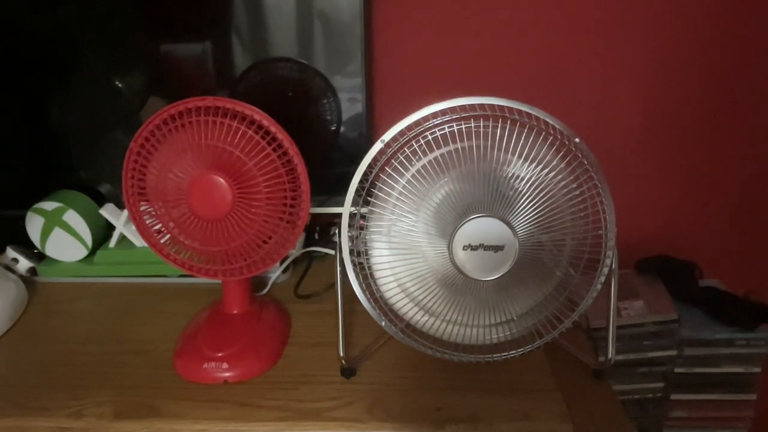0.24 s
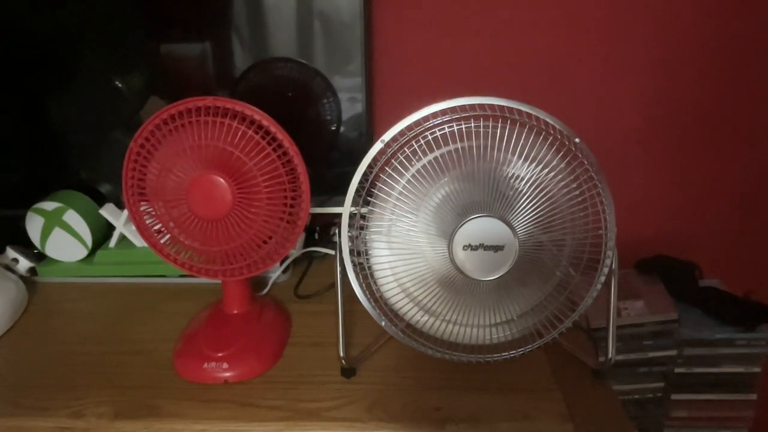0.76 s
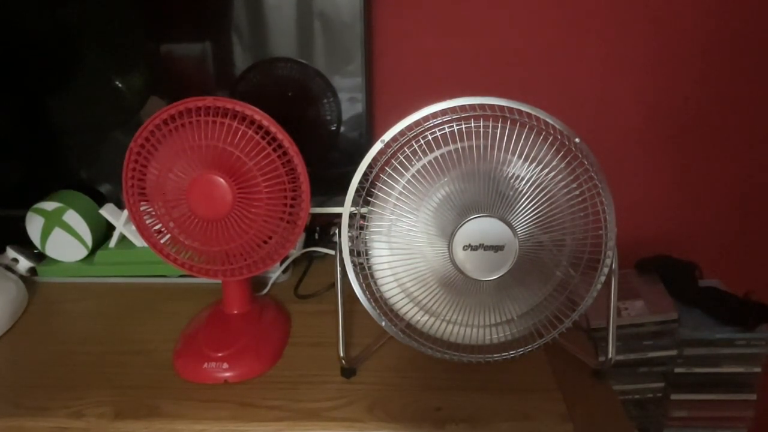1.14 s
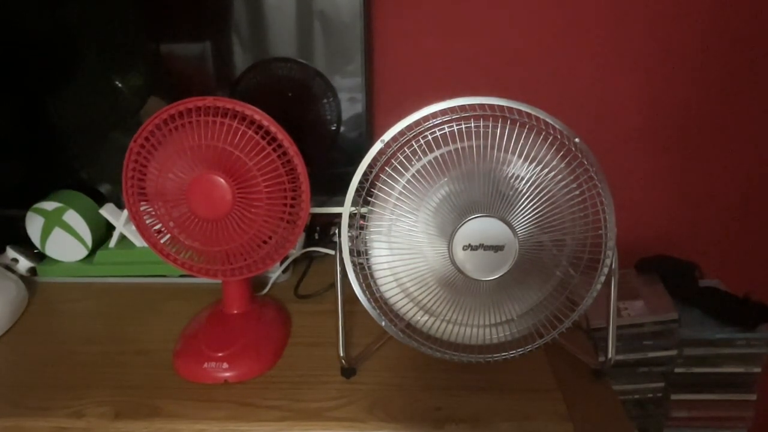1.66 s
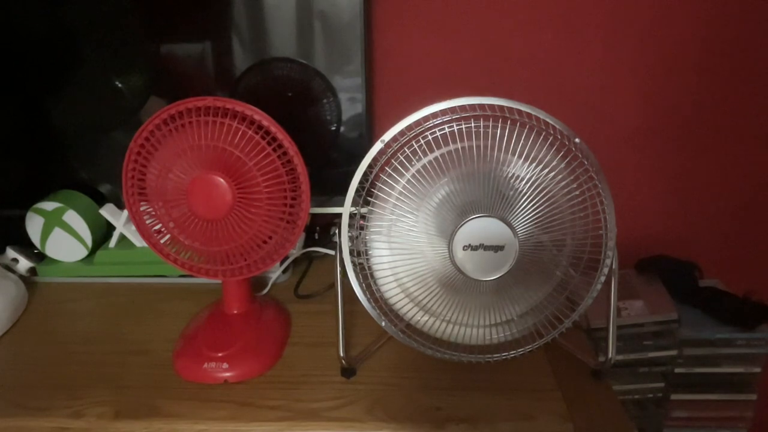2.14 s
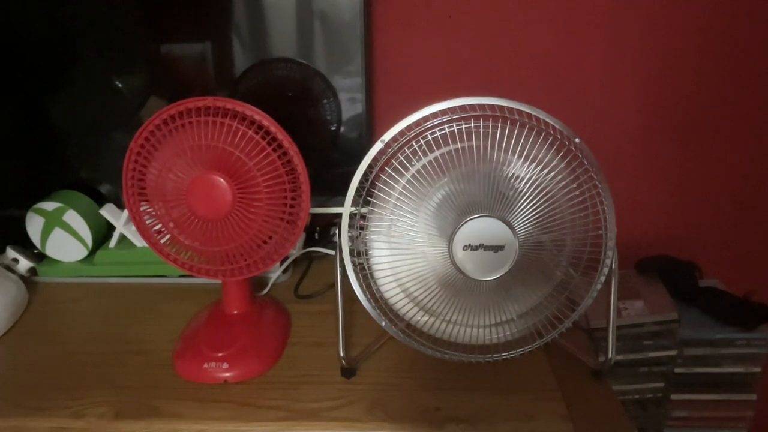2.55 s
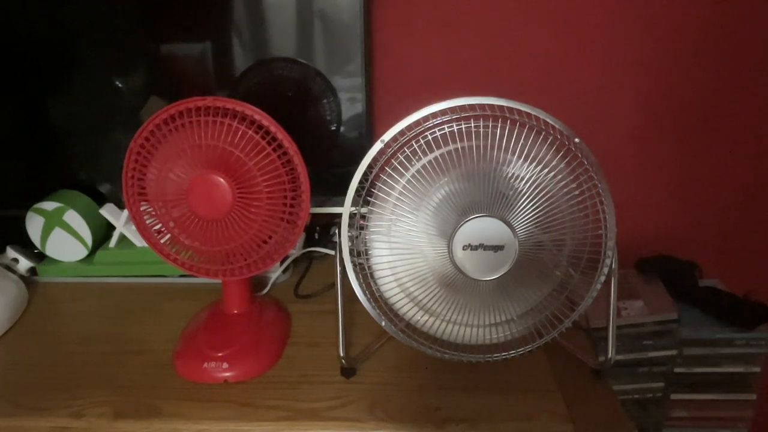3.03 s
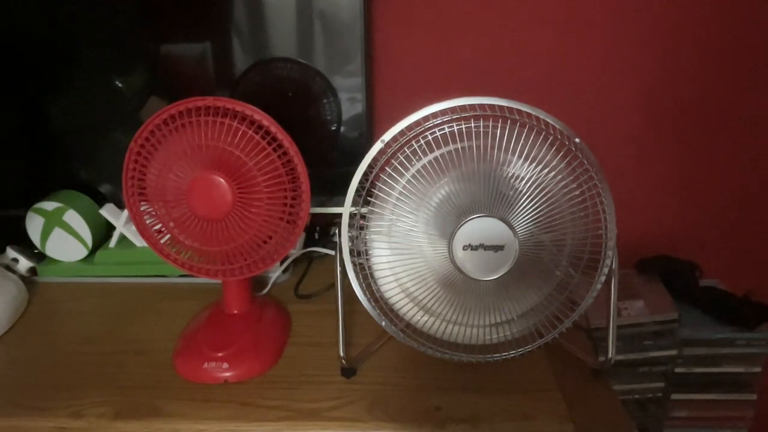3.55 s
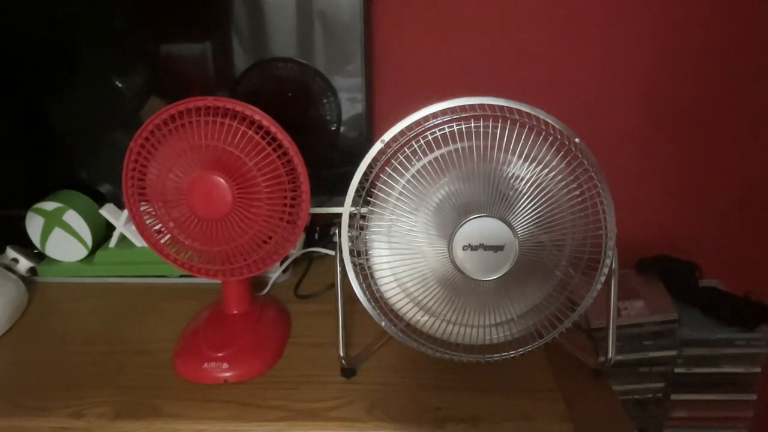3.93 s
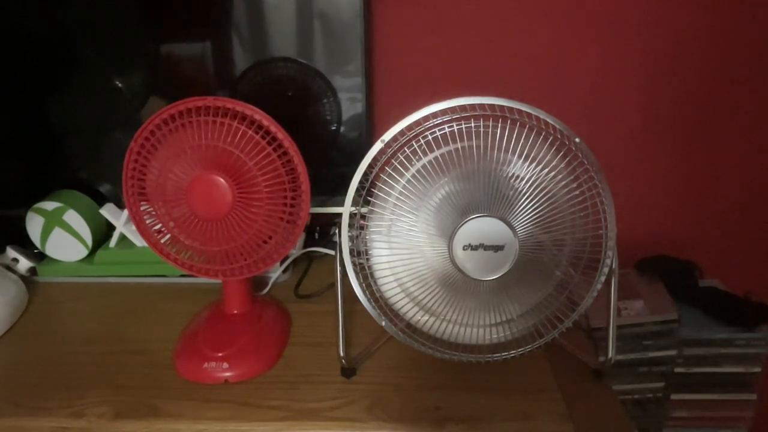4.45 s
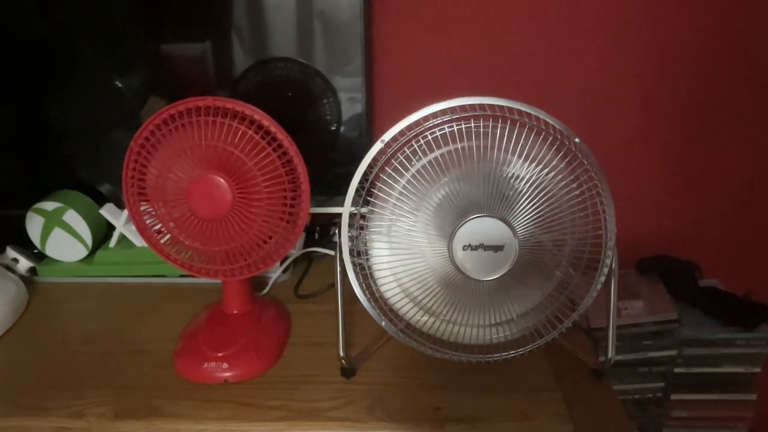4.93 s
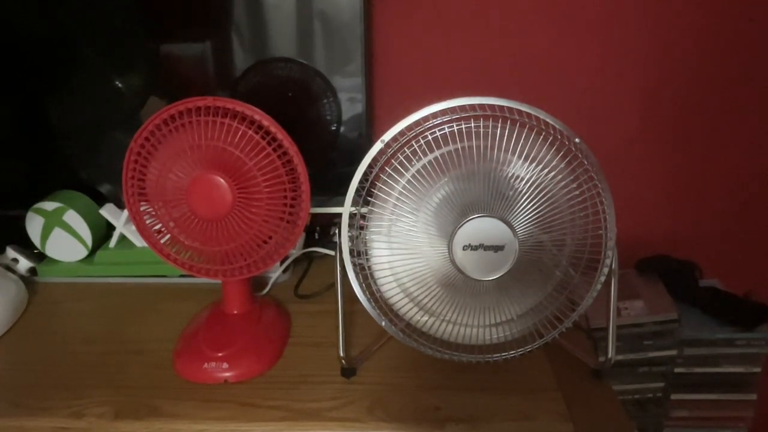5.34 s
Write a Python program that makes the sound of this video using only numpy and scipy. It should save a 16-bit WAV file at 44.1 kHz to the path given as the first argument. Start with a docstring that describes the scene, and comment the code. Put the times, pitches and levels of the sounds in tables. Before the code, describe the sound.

Two desk fans blow straight onto close microphones: deep, uneven wind rumble and fluttering buffets over a quiet airy hiss and faint whine.

```python
"""In a small room, two desk fans on low speed blow straight at a pair of microphones.
Shaken tones that follow the fan speed make a soft whine; coloured noise is the hiss of the blades.
Band-filtered noise makes the draught's rumble on the ports, which swells and sinks with the flow.
Short wave packets that fall in pitch are eddies, heard as quick buffets, flutters and thumps."""
import sys
import numpy as np
from scipy import signal
from scipy.fft import rfft, irfft, next_fast_len
from scipy.io import wavfile
from scipy.ndimage import uniform_filter1d

SR = 44100
rng = np.random.default_rng(int(sys.argv[2]) if len(sys.argv) > 2 else 0)


def generate_wav(sig):
    """Save sig (samples, or channels by samples) to the path in sys.argv[1] as 16-bit PCM at SR."""
    pcm = np.round(np.clip(np.atleast_2d(sig).T, -1, 1) * 32767).astype(np.int16)
    wavfile.write(sys.argv[1], SR, pcm)


N = 246078  # samples in the scene


def from_db(db):
    """Logarithmic level: decibels to amplitude gain."""
    return 10 ** (np.asarray(db) / 20)


def rms_one(x):
    """Normalisation: scale to unit root mean square over all channels."""
    return x / np.sqrt(np.mean(x ** 2) + 1e-20)


def in_time(rows):
    """Linear interpolation: a curve over time read at every sample."""
    return np.interp(np.arange(N) / SR, *np.transpose(rows))


def at_hz(points, hz):
    """Logarithmic frequency scale: a table read at the frequencies hz."""
    table = np.array(points)
    return np.interp(np.log(np.maximum(hz, 1)), np.log(table[:, 0]), table[:, 1])


def drift(rate):
    """Low-passed noise: slow chance with about `rate` changes a second, unit rms."""
    step = 40  # samples between the slow values
    pole = np.exp(-2 * np.pi * rate * step / SR)
    white = rng.standard_normal(N // step + 2002)
    slow = signal.lfilter([1], [1, -2 * pole, pole * pole], white)[2000:]  # settled part only
    return np.interp(np.arange(N) / step, np.arange(len(slow)), rms_one(slow))


def butter(x, edges_hz, kind):
    """Maximally flat response: a causal second-order Butterworth filter."""
    return signal.sosfilt(signal.butter(2, edges_hz, kind, fs=SR, output="sos"), x)


def tone(hz, level_db, pan_db, lag_ms, unsteady, width_hz=20, own=0.55, fade_db=2.0):
    """Random modulation: turbulent inflow shakes level and phase, partly alike at both microphones."""
    shared, near, far = (drift(width_hz) + 1j * drift(width_hz) for _ in range(3))
    shake = 1 + unsteady * (np.sqrt(1 - own) * shared + np.sqrt(own) * np.array([near, far]))
    left, right = shake * np.exp(2j * np.pi * np.cumsum(hz) / SR)
    left = left * np.exp(-2j * np.pi * hz * lag_ms / 1000)
    fading_db = fade_db * min(unsteady, 1) * drift(2)
    pair = np.real([left * from_db(pan_db), right])
    return from_db(level_db + fading_db) * rms_one(pair)


# fan speed, as the pitch of the main whine: t/s, f/Hz
FAN_SPEED = [(0, 650), (2.6, 651), (3.3, 655), (4.3, 658.5), (5.58, 660)]
# whine of one fan: multiple of the main pitch, starting level/dB, level slope/(dB per % of speed),
# left over right/dB, left lag/ms
WHINE_TONES = [(1, -45, -3.5, -2, 1.246), (1.546, -65.5, 4.5, 5, 0.98), (1.697, -60.5, 2, 2, 0.8),
               (2.275, -64, 1.5, 4, 0.77), (2.984, -66, 3.5, 12, .64)]
# shake of the main tone as a share of its level, and the power of the multiple by which it grows
UNSTEADY, UNSTEADY_POWER = .22, 2.4
# thin tone of the other fan: f/Hz, level/dB
STEADY_WHINE_HZ, STEADY_WHINE_DB = 1861.0, -68.5


def whine():
    """Proportional pitch: one fan's tones follow its speed over the room's peaks and dips; the other's holds."""
    pitch_hz = in_time(FAN_SPEED)
    faster_percent = 100 * (pitch_hz / pitch_hz[0] - 1)
    tones = np.zeros((2, N))
    for multiple, level_db, slope_db, pan_db, lag_ms in WHINE_TONES:
        unsteady = UNSTEADY * multiple ** UNSTEADY_POWER
        tone_db = level_db + slope_db * faster_percent
        tones += tone(multiple * pitch_hz, tone_db, pan_db, lag_ms, unsteady)
    steady_hz = np.full(N, STEADY_WHINE_HZ)
    return tones + tone(steady_hz, STEADY_WHINE_DB, pan_db=2.5, lag_ms=0.52, unsteady=0.14)


# spectrum of air through blades and grilles: f/Hz, relative density level/dB
AIR_SPECTRUM = [(400, 0.5), (880, -2), (1100, -3), (1300, -3), (1550, -3.5), (1950, -4.5), (2700, -3.5),
                (3400, -8.5), (4300, -10.5), (5500, -8), (7000, -13.5), (9000, -22), (10800, -34),
                (13500, -39)]
# its narrow peaks and dips: centre f/Hz, width/Hz, level/dB
AIR_PEAKS = [(672, 115, 12), (1344, 77, -3), (1560, 150, 2), (1730, 78, 0), (1870, 91, 3.5), (2000, 90, -1),
             (2270, 260, 2.5), (2400, 67, 0.5)]
AIR_DB, BLADE_HZ = -44.5, 87  # hiss level/dB, blade passing rate f/Hz


def blade_air(chop=0.04, waver_db=0.53):
    """Amplitude modulation: grille hiss, coloured by desk and walls, is chopped by each passing blade."""
    hz = np.fft.rfftfreq(N, 1 / SR)
    colour_db = at_hz(AIR_SPECTRUM, hz)
    for centre_hz, width_hz, peak_db in AIR_PEAKS:
        colour_db = colour_db + peak_db / (1 + (2 * (hz - centre_hz) / width_hz) ** 2)
    hiss = irfft(rfft(rng.standard_normal((2, N))) * from_db(colour_db), N)
    passing = 1 + chop * np.sin(2 * np.pi * BLADE_HZ * np.arange(N) / SR)
    return from_db(AIR_DB + waver_db * drift(27)) * passing * rms_one(hiss)


# strength of the draught, with its surges and lulls: t/s, level/dB
DRAUGHT_STRENGTH = [(0.0, -25), (0.6, -24.5), (0.68, -30.5), (0.82, -22.5), (1.2, -25.5), (1.33, -28.5),
                    (1.45, -23.5), (2.02, -25.5), (2.14, -23.5), (2.28, -23), (2.41, -29.5), (2.47, -22.5),
                    (2.62, -24.5), (2.7, -35), (2.8, -25.5), (3.7, -23.5), (4.08, -26), (4.5, -23.5),
                    (4.72, -25), (5.58, -27)]


def flow(strong, stir=0.29, stir_s=.035, calm_db=-25):
    """Short-time power: draught strength in dB, raised where strong eddies stir the air."""
    power = uniform_filter1d(np.mean(strong ** 2, axis=0), int(stir_s * SR))
    power = np.maximum(power, 0)
    stirred_db = stir * 10 * np.log10(1 + power / from_db(calm_db) ** 2)
    return in_time(DRAUGHT_STRENGTH) + stirred_db


# spectrum of the rumble: f/Hz, relative density level/dB
RUMBLE_SPECTRUM = [(20, -23.5), (28, -18.5), (40, -8.5), (62, 6), (85, 2), (120, 0), (180, -5), (260, -9.5),
                   (350, -14), (450, -20), (600, -25), (800, -36), (1100, -52.5)]


def draught(flow_db, level_db=-24.0, lumpy_db=2, patchy_db=2, eddy_rate=24, gust_tilt=0.94):
    """Turbulence spectrum: the smallest eddies rumble; a stronger flow lifts the upper bands most."""
    swing_db = flow_db - flow_db.mean() + lumpy_db * drift(eddy_rate)
    edges_hz = 18 * 2 ** np.arange(0, 6.1, .5)  # half-octave bands
    white = rng.standard_normal((2, 2, N + SR // 2))
    rumble = np.zeros((2, N))
    for k, (low, high) in enumerate(zip(edges_hz, edges_hz[1:])):
        hz = np.sqrt(low * high)
        response = np.clip(1 + gust_tilt * np.log2(hz / 80), .8, 1.5)
        gain = rms_one(from_db(response * swing_db + patchy_db * drift(eddy_rate)))
        band = butter(white[k % 2], [low, high], "band")[:, -N:]  # neighbours use separate noise
        rumble += from_db(at_hz(RUMBLE_SPECTRUM, hz)) * gain * band
    return from_db(level_db) * rms_one(rumble)


# strength of eddies at each pitch: f/Hz, relative level/dB
EDDY_STRENGTH = [(45, -7), (65, -0.5), (120, 1), (200, 0), (300, 1.5), (420, -1.5), (560, -10), (800, -16)]
# weak eddies: rate/(1/s), rms level of them all/dB, spread of strength either way/dB
EDDIES_PER_S, EDDY_DB, EDDY_SPREAD_DB = 85, -27, 2


def weak_eddies(flow_db, cycles=0.88):
    """Random shedding: weak eddies of all sizes, stronger in a surge, as rows like those of STRONG_EDDIES."""
    chance = rng.random((int(EDDIES_PER_S * N / SR), 3))
    at = (chance[:, 0] * N).astype(int)
    lowest, highest = EDDY_STRENGTH[0][0], EDDY_STRENGTH[-1][0]
    hz = lowest * (highest / lowest) ** chance[:, 1]
    spread_db = EDDY_SPREAD_DB * (2 * chance[:, 2] - 1)
    level_db = flow_db[at] + at_hz(EDDY_STRENGTH, hz) + spread_db
    return zip(at / SR, level_db, hz, np.full(len(at), cycles))


# lesser eddies: level against the strong one/dB, pitch spread either way/octaves
WAKE_DB, WAKE_OCTAVES = -11.5, 1.077
# middle delay/s, scatter either way/s, trailing of lower ones/cycles
WAKE_DELAY_S, WAKE_SCATTER_S, WAKE_TRAIL = 0.00402, 0.01199, 1.1


def wakes(eddies, count=3, cycles=1.13):
    """Eddy break-up: each strong eddy yields lesser ones; low pitch adds delay, scatter moves them in time."""
    rows = []
    for s, level_db, hz, _ in eddies:
        for pitch, time in rng.uniform(-0.998, 1, (count, 2)):
            own_hz = np.clip(hz * 2 ** (WAKE_OCTAVES * pitch), 50, 900)
            trail_s = WAKE_TRAIL * (1 / own_hz - 1 / hz)
            delay_s = WAKE_DELAY_S + WAKE_SCATTER_S * time + trail_s
            size_db = min(at_hz(EDDY_STRENGTH, own_hz) - at_hz(EDDY_STRENGTH, hz), 4)
            rows.append((s + delay_s, level_db + WAKE_DB + size_db, own_hz, cycles))
    return rows


SLOWING = .18  # an eddy slows as it spreads: growth of its period per unit of time


def buffet(level_db, hz, cycles):
    """Chirped wave packet: a few swings of pressure swell, fade and drop in pitch."""
    t = np.arange(-(SR // 10), SR // 10) / SR
    turns = np.log(np.maximum(1 + SLOWING * hz * t, .01)) / SLOWING  # cycles from the crest
    swell = from_db(level_db) * np.exp(-.5 * (turns / cycles) ** 2)
    ends = np.minimum((t[-1] - np.abs(t)) / .03, 1)
    phase = rng.random((2, 1))  # its own in each channel
    return swell * ends * np.cos(2 * np.pi * (turns + phase))


# strong eddies striking the ports, deep thumps to quick flutters:
# crest t/s, crest level/dB, crest f/Hz, half-length/cycles
STRONG_EDDIES = [(0.042, -12, 400, 0.46), (0.05, -12, 113.6, 1.1), (0.109, -18.5, 309, 1.1),
                 (0.121, -22.5, 516, 0.65), (0.172, -8, 174, 0.54), (0.294, -12, 63.3, 0.81),
                 (0.338, -18, 313, 0.76), (0.431, -16, 80, 1.7), (0.476, -13.5, 132.3, 0.57),
                 (0.531, -14, 200, 0.6), (0.538, -14, 74.8, 0.9), (0.58, -15.0, 252, 0.72),
                 (0.589, -10.5, 92, 0.6), (0.624, -14, 145, 0.48), (0.728, -15, 98.8, 0.92),
                 (0.786, -13.5, 200, 0.41), (0.796, -14.5, 226.5, 0.48), (0.889, -16.5, 219, 1.6),
                 (0.894, -18, 397, 0.8), (0.896, -15.5, 550, 0.6), (0.9, -14, 254.5, 1.4),
                 (0.925, -11, 310, 0.35), (0.999, -11, 180, 0.31), (1.011, -10, 113, 0.48),
                 (1.048, -12, 145, 0.47), (1.102, -8.5, 101.5, 0.53), (1.147, -14, 253, 0.6),
                 (1.169, -16.5, 500, 0.82), (1.174, -11, 178, 0.65), (1.23, -21, 448, 2.5),
                 (1.235, -4.5, 222, 0.54), (1.241, -5.5, 114.2, 0.35), (1.247, -11.5, 354, 0.39),
                 (1.259, -12, 281, 0.9), (1.412, -22.5, 502, 1.3), (1.415, -12, 140, 1.3),
                 (1.415, -10, 278, 0.68), (1.436, -23, 520, 0.7), (1.588, -16, 202, 1.4),
                 (1.593, -15, 275, 0.87), (1.595, -16.5, 115, 1.4), (1.816, -13, 80, 0.48),
                 (1.834, -10, 400, 0.6), (1.84, -11.5, 145.5, 0.66), (1.88, -14.5, 81.6, 1),
                 (2.033, -14.5, 79, 0.6), (2.091, -16.5, 392, 1.6), (2.095, -14, 229, 1.6),
                 (2.107, -14.5, 115, 0.54), (2.163, -7, 181.4, 0.6), (2.175, -9.5, 81.3, 0.52),
                 (2.176, -16.0, 200, 0.82), (2.306, -16, 350.5, 1.4), (2.343, -15.5, 66.2, 0.9),
                 (2.468, -12, 75, 1.1), (2.505, -15, 173.3, 0.6), (2.517, -18, 179.5, 0.9),
                 (2.604, -15, 160.3, 0.6), (2.633, -20, 248, 1.8), (2.641, -6.5, 113.4, 0.52),
                 (2.735, -17.5, 79, 1.5), (2.79, -13.5, 306, 0.75), (2.843, -12.5, 285, 0.33),
                 (2.853, -11, 100, 0.36), (2.881, -15.5, 180, 0.39), (2.889, -8, 97.4, 1.3),
                 (2.895, -14, 200, 0.79), (2.941, -10.5, 286, 0.52), (2.959, -23.5, 672, 0.6),
                 (2.974, -7.0, 80.5, 0.42), (2.996, -24.5, 481, 0.59), (3.078, -14.5, 226, 1.7),
                 (3.091, -11, 100, 0.9), (3.208, -16, 350, 0.6), (3.218, -15, 129.4, 1.8),
                 (3.256, -7.5, 283, 0.48), (3.274, -11.5, 400, 0.5), (3.279, -14, 200, 0.4),
                 (3.292, -12, 74.7, 0.55), (3.366, -12, 89, 1.4), (3.389, -10, 287, 0.53),
                 (3.397, -11, 115, 0.46), (3.43, -10.5, 400, 0.52), (3.439, -17.5, 630, 0.9),
                 (3.439, -15, 358, 0.3), (3.45, -14, 308, 0.97), (3.478, -14.5, 254, 0.9),
                 (3.549, -17.5, 358, 0.6), (3.661, -19.5, 482, 0.8), (3.665, -15.5, 161, 1.2),
                 (3.673, -12.5, 90, 1.4), (3.689, -16.5, 160, 1.2), (3.692, -23.5, 620, 0.6),
                 (3.693, -12.5, 438, 0.52), (3.696, -8.5, 257.5, 0.37), (3.756, -9.0, 117, 0.66),
                 (3.774, -13, 251, 0.45), (3.776, -17.5, 440, 0.5), (3.792, -11, 92.3, 0.78),
                 (3.805, -12.5, 493, 0.67), (3.82, -18.5, 616, 0.56), (3.859, -15.5, 145, 0.98),
                 (3.903, -14.5, 356, 0.47), (3.924, -18, 500, 0.6), (3.951, -12, 399, 0.55),
                 (3.983, -14, 255, 0.82), (3.985, -19.5, 493, 2), (3.985, -8, 355, 0.6),
                 (4.004, -14, 80, 1.7), (4.049, -14, 143, 1.2), (4.109, -15, 200, 0.59),
                 (4.12, -13.5, 285, 1.6), (4.157, -21, 451, 0.8), (4.193, -15.5, 204, 0.61),
                 (4.198, -15, 478, 0.53), (4.205, -9.5, 145, 0.4), (4.22, -12, 159.3, 0.53),
                 (4.303, -10.5, 98, 0.9), (4.395, -15.5, 90, 1.2), (4.43, -11, 354, 0.92),
                 (4.436, -13, 388, 0.85), (4.453, -14.5, 128.7, 1.1), (4.459, -8, 75, 1.4),
                 (4.473, -13.5, 308, 0.7), (4.677, -8.5, 142, 0.51), (4.791, -17, 79, 1.8),
                 (4.836, -21, 397, 0.63), (4.895, -10.5, 82.4, 0.6), (4.914, -13.5, 197.3, 0.9),
                 (5.01, -16.5, 169, 0.74), (5.08, -13.5, 395, 1.1), (5.115, -12.5, 160, 0.48),
                 (5.178, -11.5, 112.5, 0.54), (5.183, -16, 180, 1.8), (5.25, -9, 158, 0.6),
                 (5.259, -16, 74.1, 1), (5.277, -16.5, 285, 1.4), (5.278, -21, 546, 0.8),
                 (5.288, -9.5, 98.8, 0.6), (5.335, -10.5, 115, 0.42), (5.364, -13, 144, 0.6),
                 (5.375, -16.5, 226.4, 1), (5.489, -13.5, 200, 0.73), (5.51, -10, 66, 0.74),
                 (5.562, -21.5, 544, 0.65), (5.567, -14, 252, 0.86)]


def buffets(eddies):
    """Superposition: eddies strike the ports singly or tumbling over one another."""
    out = np.zeros((2, N + 2 * SR))  # a second of margin at each end
    for s, *shape in eddies:
        eddy = buffet(*shape)
        start = SR + round(s * SR) - eddy.shape[1] // 2
        out[:, start:start + eddy.shape[1]] += eddy
    return out[:, SR:SR + N]


# left-right likeness of the microphone pair: f/Hz, coherence (0-1)
PAIR_LIKENESS = [(30, .96), (65, .93), (120, .82), (200, .67), (300, .48), (430, .42), (580, .62),
                 (900, .5), (1150, .8), (1500, .87), (2500, .8), (3900, .92), (7500, .76), (9500, .95)]
# how far left lags right: f/Hz, phase/rad
LEFT_LAG = [(20, 0), (140, .12), (280, .65), (450, 1.8), (620, 3.0), (850, 3.6), (1000, 5.3), (1350, 6.3),
            (1900, 7.8), (2500, 9.5), (3500, 12.4), (6300, 13.5), (9000, 15.7), (11000, 15.8),
            (13000, 18.8)]
# left over right: f/Hz, level/dB
LEFT_BALANCE = [(60, -.5), (130, -1.2), (220, -2), (400, 0), (600, 3), (800, 4.8), (1000, 2.5), (1200, 0),
                (1700, -.4), (2100, 2), (2600, .5), (4000, 0)]


def microphones(pair):
    """Spatial coherence: two unrelated sounds blend to set likeness, lag and balance by frequency."""
    size = next_fast_len(N + SR // 10)
    hz = np.fft.rfftfreq(size, 1 / SR)
    common, apart = rfft(pair, size)
    alike = at_hz(PAIR_LIKENESS, hz)
    common = common * np.sqrt((1 + alike) / 2)
    apart = apart * np.sqrt((1 - alike) / 2)
    lean = from_db(at_hz(LEFT_BALANCE, hz) / 2)  # half the balance on each side
    left = (common + apart) * lean * np.exp(-1j * at_hz(LEFT_LAG, hz))
    right = (common - apart) / lean
    return irfft([left, right], size)[:, :N]


def scene():
    """Linear mixing: wind on the ports in front, the fans' own sound behind."""
    tones, hiss, strong = whine(), blade_air(), buffets(STRONG_EDDIES)
    flow_db = flow(strong)
    weak = from_db(EDDY_DB) * rms_one(buffets(weak_eddies(flow_db)))
    lesser = buffets(wakes(STRONG_EDDIES))
    wind = strong + lesser + weak + draught(flow_db)
    return microphones(wind + hiss) + tones


CUTOFF_HZ = 15100  # stopband edge


def record(dry, bass_cut_hz=31):
    """Band limiting and soft saturation: deepest bass cut, highest peaks rounded, top cut."""
    lean = butter(dry, bass_cut_hz, "high")
    rounded = lean / (1 + (lean / .95) ** 6) ** (1 / 6)
    top_cut = signal.cheby2(12, 70, CUTOFF_HZ, fs=SR, output="sos")
    return signal.sosfilt(top_cut, rounded)


dry = scene()
out = record(dry)
generate_wav(out)
```